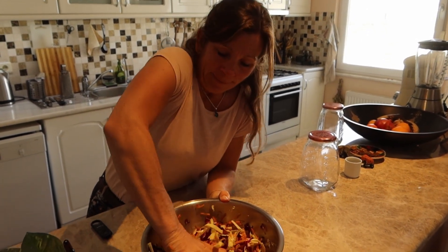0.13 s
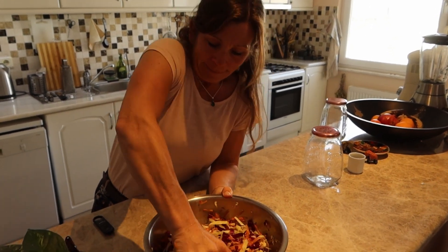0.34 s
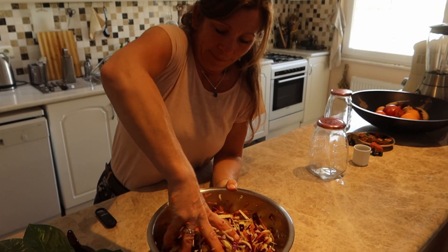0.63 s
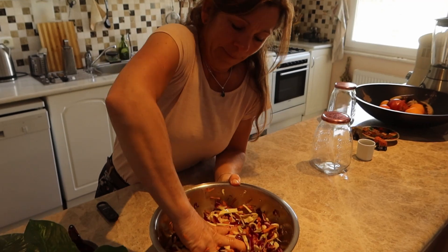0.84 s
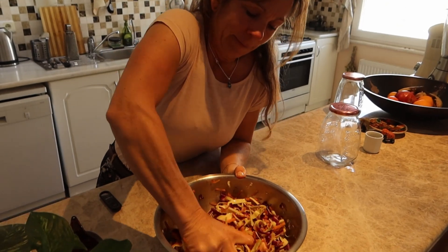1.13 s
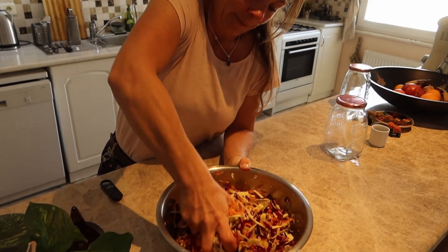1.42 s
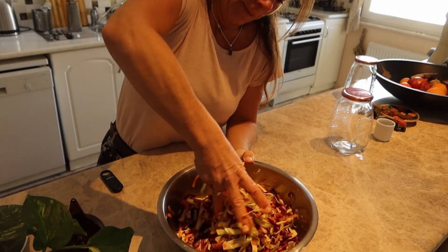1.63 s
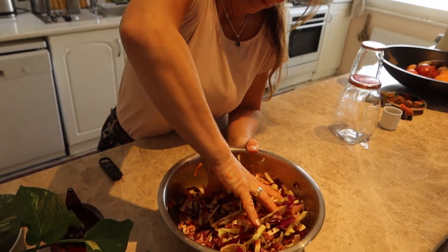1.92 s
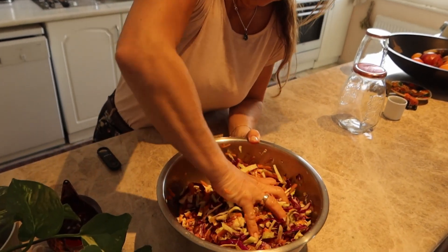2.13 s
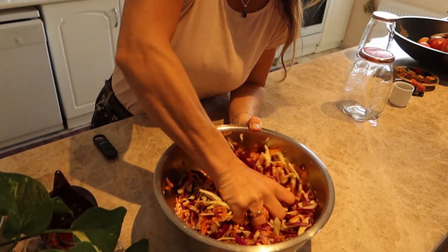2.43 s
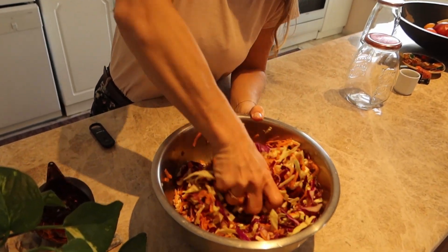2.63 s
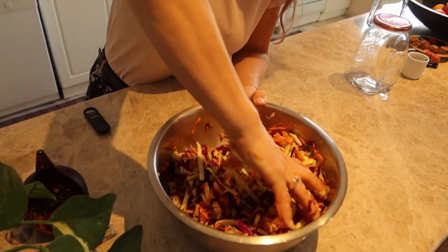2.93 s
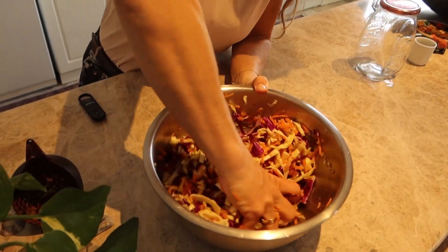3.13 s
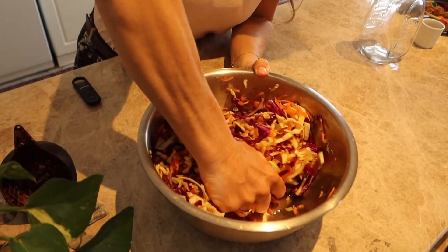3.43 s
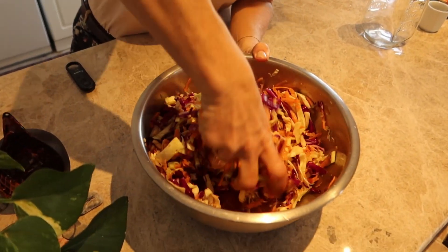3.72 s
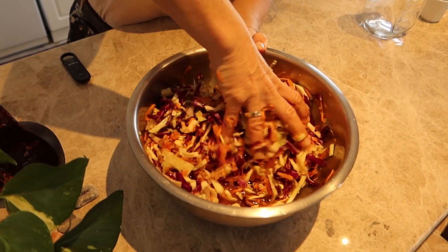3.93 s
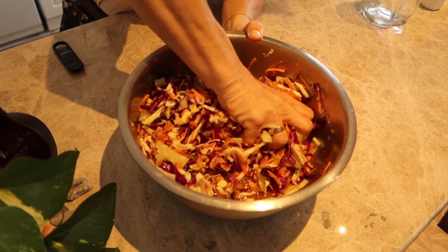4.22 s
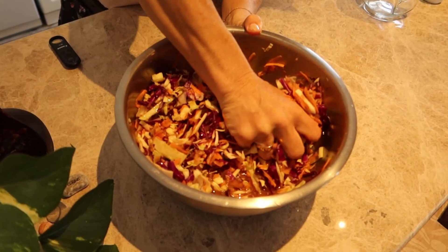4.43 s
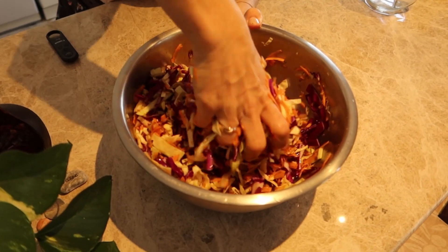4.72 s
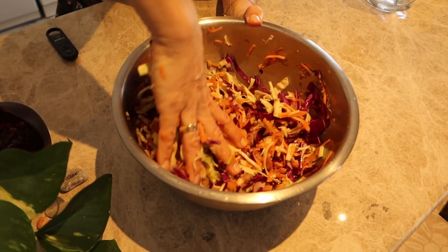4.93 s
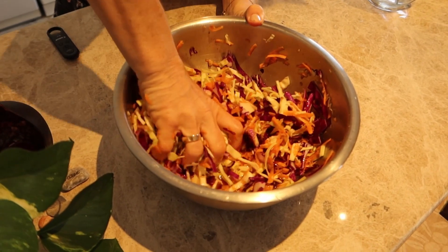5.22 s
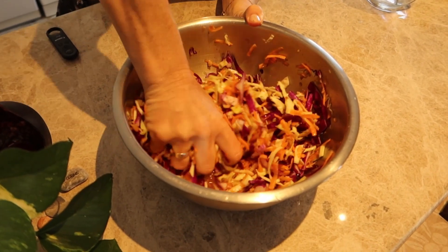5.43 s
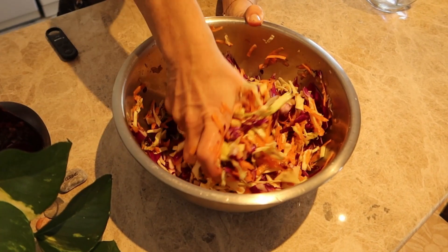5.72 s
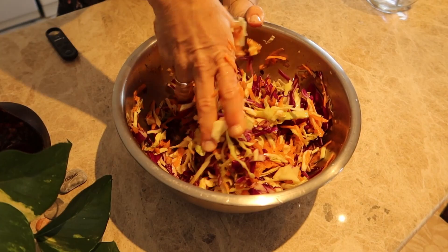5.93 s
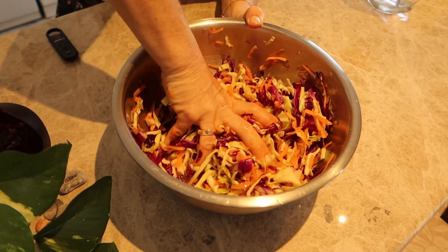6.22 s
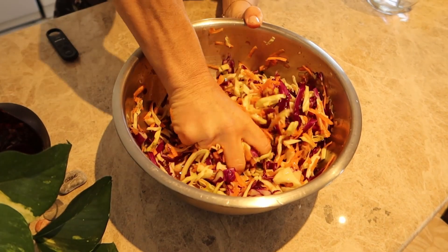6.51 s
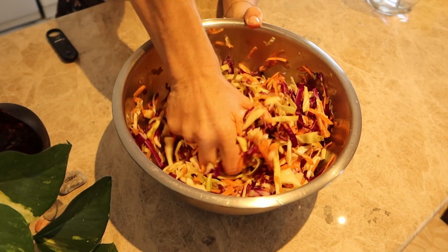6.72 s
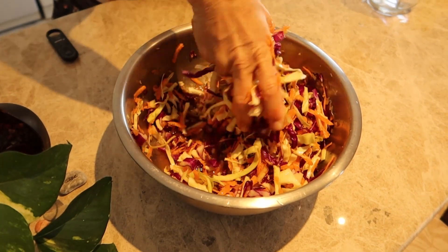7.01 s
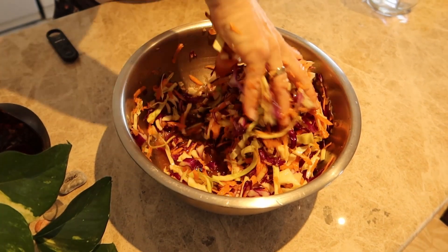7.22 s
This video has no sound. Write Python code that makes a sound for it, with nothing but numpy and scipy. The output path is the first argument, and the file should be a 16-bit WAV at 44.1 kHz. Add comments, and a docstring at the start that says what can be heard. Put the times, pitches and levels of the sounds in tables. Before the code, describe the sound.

Seven wet, crunchy squeezes of shredded cabbage and carrot in a metal bowl, with short gaps between them. The first two are softer, with a bright double tick of a ring on steel; the third is snappier; the fourth gushes with low squelches; the fifth opens with a sharp leaf squeak. The last two crackle and squelch, then die away. Close and dry, faint tiled reflections, steady low appliance hum beneath.

```python
"""Tiled kitchen: a hand kneads shredded wet vegetables in a steel bowl, about one squeeze a second.
Shreds crackle as clumped ringing clicks over shaped noise, and snap as a click with a dying spray.
Air pockets squelch as resonant noise bursts, brine squirts as narrow ones, wet leaves squeak in overtones.
A ring ticks on the steel and wakes its modes; low thumps go through the counter.
An appliance hums in wavering tones over shaped room air, and feedback delays give the tiled echo."""
import sys
import numpy as np
from scipy import signal
from scipy.fft import rfft, irfft
from scipy.io import wavfile
from scipy.ndimage import uniform_filter1d

SR = 44100
rng = np.random.default_rng(int(sys.argv[2]) if len(sys.argv) > 2 else 0)


def generate_wav(sig):
    """Save sig (samples, or channels by samples) to the path in sys.argv[1] as 16-bit PCM at SR."""
    pcm = np.round(np.clip(np.atleast_2d(sig).T, -1, 1) * 32767).astype(np.int16)
    wavfile.write(sys.argv[1], SR, pcm)


N = 324620  # length in samples
FIRM_DB = -30  # crackle level that counts as firm pressure


def from_db(db):
    """Turn dB into gain."""
    return 10 ** (np.asarray(db) / 20)


def rms_one(x):
    """Scale to rms 1."""
    return x / np.sqrt(np.mean(x ** 2) + 1e-20)


def at_hz(points, hz):
    """Read a spectrum in dB on a log-frequency axis."""
    points_hz, points_db = np.array(points).T[:2]
    return np.interp(np.log(hz), np.log(points_hz), points_db)


def drift(rate_hz):
    """Slow chance: noise at a reduced rate through a double one-pole low-pass; spread 1."""
    step = 40  # samples between drawn points
    r = np.exp(-2 * np.pi * rate_hz * step / SR)
    noise = rng.standard_normal(N // step + 2002)
    slow = signal.lfilter([1], [1, -2 * r, r * r], noise)[2000:]
    return np.interp(np.arange(N) / step, np.arange(len(slow)), rms_one(slow))


def ring(clicks, hz, t60):
    """A resonance: a unit click starts a sine of height 1 that falls 60 dB in t60 seconds."""
    r = from_db(-60 / (t60 * SR))
    w = 2 * np.pi * hz / SR
    return signal.lfilter([0, np.sin(w)], [1, -2 * r * np.cos(w), r * r], clicks + 1e-18)


def band(x, order, hz, kind):
    """Butterworth filter."""
    return signal.sosfilt(signal.butter(order, hz, kind, fs=SR, output="sos"), x)


def add(out, s, piece):
    """Mix a piece in at time s."""
    i = max(round(s * SR), 0)
    out[i:i + len(piece)] += piece[:N - i]


def colour(x, spectrum):
    """Shape to a spectrum; rms 1."""
    hz = np.maximum(np.fft.rfftfreq(N, 1 / SR), 1)
    return rms_one(irfft(rfft(x) * from_db(at_hz(spectrum, hz)), N))


def scattered(level_db, spread_db, low_hz, high_hz, count):
    """Rows (time [s], level [dB], pitch [Hz]) at random moments, around the level of their moment."""
    when, pitch = rng.random((count, 2)).T
    db = level_db[(when * N).astype(int)] + spread_db * rng.standard_normal(count)
    return np.transpose([when * N / SR, db, low_hz * (high_hz / low_hz) ** pitch])


def stick_slip(hz, fall_db, wobble, overtones):
    """Slip-and-grab tone: a fundamental with unsteady pitch and overtones falling by fall_db each."""
    phase = 2 * np.pi * np.cumsum(hz * (1 + wobble)) / SR
    return sum(from_db(fall_db * k) * np.sin((k + 1) * phase) for k in range(overtones + 1))


def grains(spectrum, per_s, spread_db, cycles, clump_db, patch_db, noise_share, count=24):
    """Clumped wet clicks, each swelling and dying over several cycles of its pitch, on a noise bed; rms 1."""
    sizes = from_db(spread_db * np.minimum(rng.exponential(1, N), 5)) * rng.choice([-1, 1], N)
    born = rng.random(N) < per_s / SR
    pitches = np.geomspace(spectrum[1][0], spectrum[-2][0], count)
    dealt = rng.integers(0, count, N)
    rings = np.zeros(N)
    for k, hz in enumerate(pitches):
        # each size of shred comes and goes on its own
        patch = from_db(at_hz(spectrum, hz) + patch_db * drift(17.8))
        once = ring(sizes * born * (dealt == k), hz, cycles / hz)
        rings += patch * hz ** 2 * ring(once, hz, cycles / hz)
    bed = colour(rng.standard_normal(N), spectrum)
    clumps = from_db(clump_db * (drift(39) + 0.73 * drift(22.0)))
    return rms_one(clumps * (np.sqrt(1 - noise_share) * rms_one(rings) + np.sqrt(noise_share) * bed))


# colour of the room air: (frequency [Hz], relative level [dB])
AIR_SPECTRUM = [(16, -53), (28, -8.5), (114, -14.5), (153, -7), (184, -2), (240, -9.5), (296, -8),
                (347, -12.5), (465, -15), (977, -22), (1120, -22.5), (2000, -34), (6080, -37),
                (14600, -41.5), (15800, -49)]
AIR_DB = -40.5  # rms


def air():
    """Steady room air: noise shaped to a mostly low spectrum."""
    return from_db(AIR_DB) * colour(rng.standard_normal(N), AIR_SPECTRUM)


# motor tones: (frequency [Hz], rms level [dB], waver [dB])
HUM_TONES = [(99.6, -52.5, 1.2), (144.3, -51, 3), (154.6, -51, 2), (176, -37, 0.66), (199.6, -40.5, 1.5),
             (253.3, -49, 0.5), (351, -49.5, 2.5), (14023, -91, .6)]


def hum():
    """Appliance motor: steady tones, each wavering in level and phase."""
    t = np.arange(N) / SR
    out = np.zeros(N)
    for hz, db, waver_db in HUM_TONES:
        level = np.sqrt(2) * from_db(db + waver_db * drift(2.65))
        out += level * np.sin(2 * np.pi * hz * t + 0.31 * waver_db * drift(2.5))
    return out


KITCHEN_T60_S, WALL_CUT_HZ = 0.22, 5000  # decay of the lows, low-pass on each round


def kitchen(x):
    """Tiled echo: eight feedback delays, duller on every round, stepped block by block."""
    out = np.zeros(N)
    dull = np.exp(-2 * np.pi * WALL_CUT_HZ / SR)
    for k, lag in enumerate((rng.uniform(.012, .04, 8) * SR).astype(int)):
        loop, state = x.copy(), [0.]
        gain = from_db(-60 * lag / SR / KITCHEN_T60_S)
        for i in range(lag, N, lag):
            back, state = signal.lfilter([gain * (1 - dull)], [1, -dull], loop[i - lag:i], zi=state)
            loop[i:i + lag] += back[:N - i]
        out += (loop - x) * (-1) ** k
    return out


# bowl pushed on the counter: (time [s], level [dB])
COUNTER_PUSHES = [(0.279, -46), (1.189, -45), (5.138, -41.5), (6.289, -47)]


def thumps():
    """A soft low push through the counter: a 60 Hz sine that swells and dies."""
    out, t = np.zeros(N), np.arange(6000) / SR
    for s, db in COUNTER_PUSHES:
        swell = t / 0.0057 * np.exp(1 - t / 0.014)
        add(out, s, from_db(db) * swell * np.sin(2 * np.pi * 60 * t))
    return out


# touches of the ring on the steel: (time [s], knock peak [dB], softness as cut-off [Hz])
STEEL_TICKS = [(.791, -18.5, 6900), (.809, -21, 5000), (3.825, -34, 4660), (4.997, -26, 990),
               (6.06, -25, 1340), (7.028, -27, 1490)]
# ringing modes of the bowl: (frequency [Hz], relative level [dB], decay t60 [s])
BOWL_MODES = [(784, -10, 0.34), (976, -7, 0.032), (1250, -7, 0.033), (1907, -8, 0.17), (2213, -9, 0.063),
              (2720, -13.5, 0.3), (3650, -7.5, 0.05)]


def bowl(kneading):
    """Each touch is a short knock that also rings the steel; all that presses on it rings faintly."""
    knocks = np.zeros(N)
    for s, db, soft_hz in STEEL_TICKS:
        knock = signal.lfilter(*signal.butter(3, [350, soft_hz], "band", fs=SR), np.arange(600) == 0)
        add(knocks, s, from_db(db) * knock / np.abs(knock).max())
    # the wet load damps the lowest ring
    pressing = band(kneading, 2, 900, "high")
    drive = from_db(-26.0) * knocks + from_db(-46) * pressing
    return knocks + sum(from_db(db) * ring(drive, hz, t60) for hz, db, t60 in BOWL_MODES)


# wet leaves slipping on each other:
# (time [s], length [s], start pitch [Hz], end pitch [Hz], level [dB], fall per overtone [dB])
LEAF_SQUEAKS = [(2.468, 0.031, 1550, 1560, -21, -14), (3.133, 0.019, 2220, 2320, -19, -6),
                (2.303, 0.05, 960, 960, -35, -20), (2.374, 0.035, 960, 990, -30.5, -17),
                (5.608, 0.019, 1010, 1180, -20.5, -18), (4.101, 0.032, 2700, 2770, -26, -6),
                (5.656, 0.032, 1200, 1000, -29.5, -5)]


def squeaks():
    """Short stick-slip between wet leaves: gliding tones with unsteady pitch and grip."""
    out, wobble, grip = np.zeros(N), drift(150), drift(200)
    for s, length, start_hz, end_hz, db, fall_db in LEAF_SQUEAKS:
        n, i = round(length * SR), round(s * SR)
        glide_hz = np.linspace(start_hz, end_hz, n)
        tone = stick_slip(glide_hz, fall_db, .022 * wobble[i:i + n], overtones=3)
        add(out, s, from_db(db + 2.5 * grip[i:i + n]) * signal.windows.tukey(n, .25) * tone)
    return out


# a leaf dragged under the palm: (time [s], pitch [Hz], level [dB], fall per overtone [dB])
PALM_SQUEAK = [(4.188, 1180, -30, -4), (4.191, 1186, -11.5, -2), (4.205, 1235, -7.5, -6),
               (4.213, 1126, -9.5, -11.5), (4.226, 930, -14, -5), (4.236, 1007, -22, -20),
               (4.254, 1084, -18.5, -20), (4.264, 1093, -35, -20), (4.31, 1160, -30, -20),
               (4.365, 1095, -34, -20)]


def long_squeak():
    """The same stick-slip, held while pitch and grip change."""
    out = np.zeros(N)
    s, *columns = np.transpose(PALM_SQUEAK)
    t = np.arange(s[0], s[-1], 1 / SR)
    hz, db, fall_db = [np.interp(t, s, column) for column in columns]
    tone = stick_slip(hz, fall_db, .03 * drift(250)[:len(t)], overtones=4)
    add(out, s[0], from_db(db + 3 * drift(200)[:len(t)]) * tone)
    return out


# narrow noise bursts: brine squirts, and a low two-note squelch near 3.17 s:
# (time [s], length [s], centre [Hz], width [Hz], level [dB])
NARROW_BURSTS = [(0.787, 0.018, 3650, 250, -32), (0.793, .022, 2760, 150, -36),
                 (0.808, 0.014, 3220, 400, -33), (3.162, 0.029, 567, 155, -22.5),
                 (3.168, 0.026, 1010, 250, -21.5), (2.498, 0.056, 1700, 350, -32),
                 (0.808, 0.029, 6300, 500, -39), (3.003, 0.061, 6570, 2000, -34.5),
                 (3.133, 0.01, 3770, 1200, -15), (3.164, 0.024, 5600, 1510, -19),
                 (3.251, 0.028, 3480, 696, -21.5), (3.255, 0.021, 4900, 800, -20),
                 (3.278, 0.033, 6000, 1810, -23), (4.128, 0.022, 6140, 2490, -19),
                 (4.147, 0.021, 6000, 2500, -18.5), (4.14, 0.059, 1930, 250, -29.5),
                 (4.271, 0.02, 6450, 2500, -24.5), (5.129, 0.024, 5930, 2500, -24)]


def narrow_bursts():
    """Squirts and one low squelch: rough noise through one resonance, taken twice."""
    out = np.zeros(N)
    noises = rng.standard_normal((len(NARROW_BURSTS), 3000))
    for (s, length, hz, width_hz, db), noise in zip(NARROW_BURSTS, noises):
        n, t60 = round(length * SR), 1.98 / width_hz
        burst = rms_one(ring(ring(noise, hz, t60), hz, t60)[300:300 + n])  # skip the build-up
        add(out, s, from_db(db) * signal.windows.tukey(n, .25) * burst)
    return out


# air pockets pressed out of the brine: (time [s], relative level [dB], pitch [Hz])
AIR_POCKETS = [(0.336, -24, 969), (0.356, -20, 988), (0.397, -13.5, 1310), (0.416, -17, 955),
               (1.188, -19, 980), (1.232, -26, 1030), (1.276, -19, 1070), (1.31, -18, 990),
               (1.378, -13.5, 2120), (2.232, -18, 2000), (2.401, -16.5, 1800), (2.502, -12, 1840),
               (2.544, -10.5, 1710), (2.57, -15, 1500), (2.602, -16, 1680), (2.63, -19.5, 1450),
               (2.66, -21, 1500), (3.2, -12, 555), (3.209, -15, 970), (3.255, -19, 560), (3.304, -4.5, 552),
               (3.294, -1, 784), (3.33, -17, 560), (3.356, -12, 1090), (3.4, -12, 550), (3.373, -10, 667),
               (3.428, -6, 765), (3.447, -9, 476), (3.49, -13, 555), (3.53, -17, 540), (4.284, -16, 1200),
               (4.4, -17, 1250), (4.925, -23, 890), (5.138, -7.5, 2020), (5.285, -19, 533),
               (5.31, -12, 1020), (5.367, -15, 940), (5.404, -12, 1980), (5.494, -7.5, 920),
               (5.52, -18, 930), (5.545, -16, 980), (5.652, -19, 1130), (5.669, -16.5, 1810),
               (6.209, -25, 820), (6.257, -14, 960), (6.342, -13, 576), (6.46, -19, 950), (6.55, -17, 940),
               (6.571, -18.5, 528), (6.64, -21, 510), (6.661, -18, 1960), (6.702, -15, 1930),
               (6.72, -21, 1400), (6.767, -16, 1250), (6.8, -21, 1450), (6.86, -27, 1350)]
SQUELCH_SCALE_S = 0.012  # time scale of the burst
SMALL_SQUELCH_OVER_DB, SMALL_SQUELCH_SPREAD_DB = 8.5, 3.0  # random pockets, relative to the squish


def squelches(squish_db):
    """Escaping air flutters: a burst of noise in a wet cavity, some of it near one note."""
    out, t = np.zeros(N), np.arange(2600) / SR / SQUELCH_SCALE_S
    shape = np.minimum(t / 0.17, 1) * np.exp(-1.6 * t ** 2)
    small = scattered(squish_db + SMALL_SQUELCH_OVER_DB, SMALL_SQUELCH_SPREAD_DB, 433, 2400, count=60)
    rows = np.vstack([AIR_POCKETS, small])
    for (s, db, hz), noise in zip(rows, rng.standard_normal((len(rows), 2600))):
        wide = ring(noise, hz, 4 / hz)
        note = rms_one(ring(wide, hz, 33.0 / hz))
        flutter = rms_one(ring(wide, hz, 1.1 / hz))
        add(out, s, from_db(db - 10.5) * shape * (note + .5 * flutter))
    return band(out, 3, 430, "high")  # keep all squelches above 430 Hz


# prominent shreds breaking: (time [s], relative level [dB], colour [Hz], treble against colour [dB])
SHRED_SNAPS = [(0.0434, -11, 6640, 11.5), (0.0664, -9, 3680, -21), (0.144, -19, 3530, -8),
               (0.1735, -12.5, 4030, 3), (0.224, -20, 6400, -11), (0.388, -11, 6300, 10),
               (0.8926, -16.5, 4680, -2), (1.1075, -8, 2880, -22), (1.1443, -8, 3450, -17),
               (1.1617, -3, 4930, -30), (1.1912, -13.5, 2330, -11), (1.277, -18, 6420, -13),
               (1.9693, -12, 3350, -5), (2.0602, -12, 4960, -12), (2.0782, -7.5, 3380, -8),
               (2.0959, -5.5, 3180, -10), (2.1077, -6, 4060, -16), (2.13, -1.5, 4650, -23),
               (2.1923, -7, 3360, -3), (2.2103, -10, 4400, 4.5), (2.2308, -8, 2780, 4),
               (2.2613, -19, 4010, 9), (2.3054, -9, 4400, -9), (2.3332, -7.5, 4800, -11),
               (2.3616, -7.5, 2390, -0.5), (2.4039, -5.5, 3570, -15), (2.4468, -6.5, 6000, -3),
               (2.575, -10, 3800, -21), (2.6173, -8, 3200, -28), (2.642, -11, 3020, -20),
               (2.7212, -22, 4450, 0), (2.7784, -20.5, 3900, -4), (3.1343, -3, 2450, -9),
               (3.1687, -8.5, 5240, -3), (3.2036, -10, 3600, 0), (3.2905, -7, 4850, -9),
               (3.3505, -3, 3630, 0), (3.3826, -4, 2230, -22), (3.4305, -14, 2600, -16),
               (3.586, -13, 3250, -23), (3.5159, -10.5, 2600, -29), (3.8242, -7.5, 2720, -13),
               (4.0208, -16, 5330, -8), (4.0943, -28, 2740, 18.5), (4.13, -3, 6470, -8),
               (4.1901, 3, 2430, -23), (4.263, -7.5, 6320, -5), (4.3156, -2.5, 6700, 0),
               (4.377, -5.5, 2740, -1), (4.3965, -7, 2120, -1), (4.4747, -6, 6450, -17),
               (4.499, -10, 3670, -13), (4.5533, -6.5, 5050, -11), (4.5785, -13.5, 2500, 6),
               (5.073, -0.5, 5630, -4.5), (5.1323, -6, 2490, -9), (5.2702, -5.5, 5300, -12),
               (5.2901, -8, 4200, -1), (5.3175, -6, 4170, -12), (5.3806, -1, 5540, -26),
               (5.463, -2, 4450, -15), (5.4905, -4, 2210, 2.5), (5.5199, -5.5, 2200, -15),
               (5.5447, -7.5, 3050, -9), (5.5667, -8.5, 4630, 7.5), (5.8012, -12, 5150, -30),
               (6.2118, -7.5, 5670, -1), (6.2346, -9, 3340, -2), (6.2936, -11, 5150, -10),
               (6.3774, -12, 5390, -2), (6.4038, -14, 4590, 10), (6.4521, -1.5, 3770, -5),
               (6.4827, -12, 5830, 6), (6.5048, -7, 6500, -4), (6.535, -0.5, 4400, -31),
               (6.576, -2.5, 2580, -26), (6.5905, -2, 4480, -38), (6.8195, -7.5, 3800, -22)]
# random smaller breaks: level at firm pressure, share of the pressure's swing, spread, mean treble
SMALL_SNAP_DB, SMALL_SNAP_FOLLOWS, SMALL_SNAP_SPREAD_DB, SMALL_SNAP_TREBLE_DB = -21, 0.62, 3, -6
# spray decay without extra treble; per dB of treble above 0: dB off the decay time, dB onto the click
SNAP_T60_S, CRISP_SHORTENS, CRISP_CLICK_DB = 0.022, 0.52, 0.27


def snaps(pressure_db):
    """A sharp break: a click and a dying spray of noise around the shred's colour, plus treble."""
    out, t = np.zeros(N), np.arange(1800) / SR
    small_db = SMALL_SNAP_DB + SMALL_SNAP_FOLLOWS * (pressure_db - FIRM_DB)
    small = scattered(small_db, SMALL_SNAP_SPREAD_DB, 2400, 10100, count=190)
    small_treble_db = SMALL_SNAP_TREBLE_DB + 5.0 * rng.standard_normal(len(small))
    rows = np.vstack([SHRED_SNAPS, np.column_stack([small, small_treble_db])])
    # the click comes 1 ms after the spray begins
    impulse = 1. * (np.arange(1800) == round(.001 * SR))
    for (s, db, hz, treble_db), noise in zip(rows, rng.standard_normal((len(rows), 1800))):
        crisp_db, treble = max(treble_db, 0), from_db(treble_db)
        near = rms_one(ring(noise, hz, 17.0 / hz))
        broad = rms_one(ring(noise, 5910, 0.0012))
        decay = from_db(-60 * t / SNAP_T60_S * from_db(CRISP_SHORTENS * crisp_db))
        spray = (near + treble * broad) * decay * np.minimum(t / 0.00091, 1)
        click = ring(impulse, hz, 8.6 / hz) + treble * ring(impulse, 8100, 0.00087)
        snap = from_db(-11.5) * spray + from_db(-4.0 + CRISP_CLICK_DB * crisp_db) * click
        add(out, s, from_db(db) * snap)
    return band(out, 2, [1500, 12000], "band")


# colour of the squish: (frequency [Hz], relative level per Hz [dB])
SQUISH_SPECTRUM = [(130, -28), (220, 5.5), (248, 5), (376, -6.5), (545, -2), (732, -7), (931, 0),
                   (1250, -7.5), (1570, -5), (3000, -16), (3900, -10), (6600, -120)]


def squish():
    """Wet mass moving: sparse low grains over a noise bed; rms 1."""
    return grains(SQUISH_SPECTRUM, per_s=700, spread_db=3.5, cycles=7.3,
                  clump_db=0.74, patch_db=1.0, noise_share=0.58)


# colour of the crackle before tilting: (frequency [Hz], relative level per Hz [dB])
CRACKLE_SPECTRUM = [(760, -60), (1300, -10), (1520, -5.5), (1670, -28), (1890, -3.5), (3860, -5),
                    (4610, -1.5), (5160, -4), (6420, -4), (7050, -9.5), (7740, -12), (15500, -41)]


def crackle(tilt_db):
    """Shreds breaking finely: dense bright grains, the top tilted against the bottom."""
    flat = grains(CRACKLE_SPECTRUM, per_s=2500, spread_db=5.0, cycles=11.1,
                  clump_db=2.12, patch_db=2.5, noise_share=0.49)
    # finer shreds crackle higher
    top = signal.sosfiltfilt(signal.butter(2, 4600, "high", fs=SR, output="sos"), flat)
    return from_db(tilt_db / 2) * top + from_db(-tilt_db / 2) * (flat - top)


# one list a squeeze, hand pressure as the level of the crackle: (time [s], level [dB])
SQUEEZES = [
    [(0.0, -37.5), (0.116, -33.5), (0.28, -31), (0.358, -25.5), (0.466, -35), (0.568, -43.5), (0.74, -62)],
    [(0.79, -45), (0.844, -37.5), (0.968, -37), (1.058, -32), (1.278, -32), (1.488, -40.5), (1.676, -63)],
    [(1.9, -52.5), (2.012, -34.5), (2.17, -29.5), (2.434, -29.5), (2.512, -33), (2.568, -26.5),
     (2.694, -36), (2.788, -44)],
    [(2.98, -53.5), (3.058, -30), (3.182, -21.5), (3.246, -26.5), (3.312, -24), (3.404, -27),
     (3.582, -34.5), (3.79, -44.5)],
    [(4.07, -45), (4.09, -28.5), (4.24, -24.5), (4.304, -34), (4.402, -28.5), (4.582, -31), (4.676, -41),
     (4.814, -43.5)],
    [(4.978, -48.5), (5.06, -32), (5.238, -28.5), (5.308, -30), (5.444, -24.5), (5.528, -24.5),
     (5.716, -38), (5.812, -38.5), (5.904, -49.5)],
    [(6.11, -50.5), (6.206, -30), (6.326, -31.5), (6.44, -27.5), (6.644, -30.5), (6.844, -36), (7.01, -48),
     (7.36, -54)],
]
# squish against crackle, one entry a squeeze: (level [dB])
SQUEEZE_WETNESS = [-1, -0.5, -3.5, 0.5, -2, -1, 0]
SOAK_DB, SOAK_S = -9, 0.15  # a squeeze starts drier; brine wells up with this time constant
SQUISH_LAG_S, SQUISH_FOLLOWS = 0.02, 1  # squish trails the pressure; share of its swing
# crackle tilt: at firm pressure, change per dB of pressure, random waver
BRIGHT_DB, BRIGHT_PER_DB, BRIGHT_WAVER_DB = -1, -0.15, 4


def hand():
    """Levels of crackle and squish and the crackle's tilt in dB, all led by the hand's pressure."""
    t = np.arange(N) / SR
    starts = np.array([rows[0][0] for rows in SQUEEZES])
    s, db = np.vstack(SQUEEZES).T
    pressure_db = np.interp(t, s, db)
    which = np.maximum(np.searchsorted(starts, t, "right") - 1, 0)
    soak_db = SOAK_DB * np.exp(-(t - starts[which]) / SOAK_S)
    wet_db = np.array(SQUEEZE_WETNESS)[which] + soak_db
    trail_db = SQUISH_FOLLOWS * (np.interp(t - SQUISH_LAG_S, s, db) - FIRM_DB)
    squish_db = FIRM_DB + trail_db + uniform_filter1d(wet_db, size=2000)
    tilt_db = BRIGHT_DB + BRIGHT_PER_DB * (pressure_db - FIRM_DB) + BRIGHT_WAVER_DB * drift(12.0)
    return pressure_db, squish_db, tilt_db


def scene():
    """Hand and bowl in the room, over hum and air."""
    pressure_db, squish_db, tilt_db = hand()
    kneading = from_db(pressure_db) * crackle(tilt_db) + from_db(squish_db) * squish()
    kneading = kneading + snaps(pressure_db) + squelches(squish_db)
    kneading = kneading + squeaks() + long_squeak() + narrow_bursts()
    # keep the kneading above 280 Hz
    kneading = band(kneading, 3, 280, "high")
    near = kneading + bowl(kneading) + thumps()
    background = air() + hum()
    return (near + from_db(-20) * kitchen(near) + background)[None]


def record(dry):
    """The microphone drops the deepest bass, peaks are rounded, the top is cut."""
    dry = band(dry, 3, 36, "high")
    rounded = .95 * np.tanh(dry / .95)
    # 50 dB down from 16.8 kHz up
    return signal.sosfilt(signal.cheby2(12, 50, 16800, fs=SR, output="sos"), rounded)


dry = scene()
out = record(dry)
generate_wav(out)
```